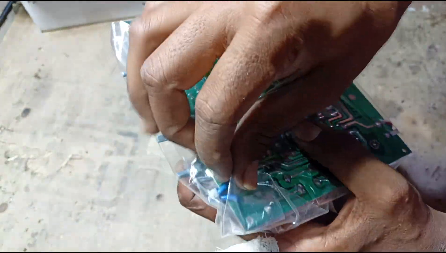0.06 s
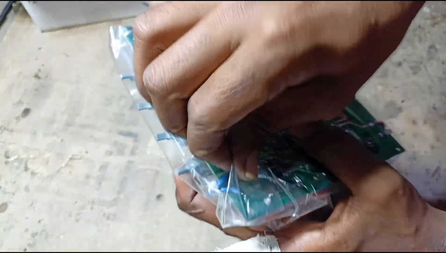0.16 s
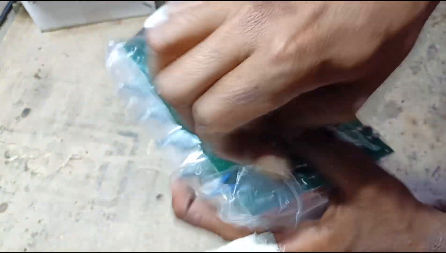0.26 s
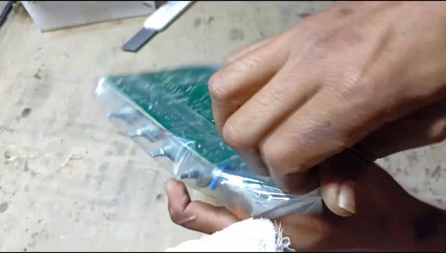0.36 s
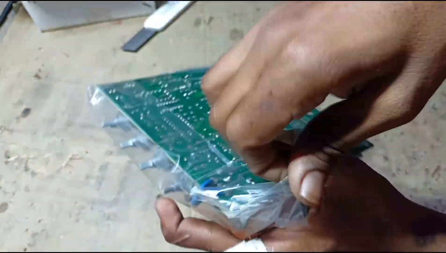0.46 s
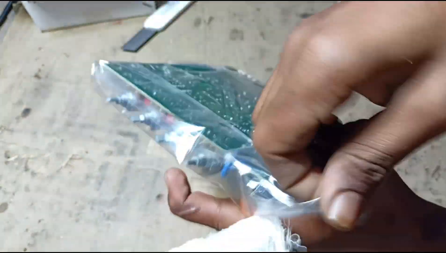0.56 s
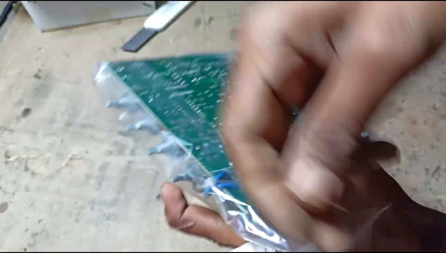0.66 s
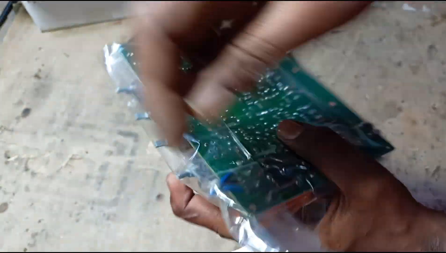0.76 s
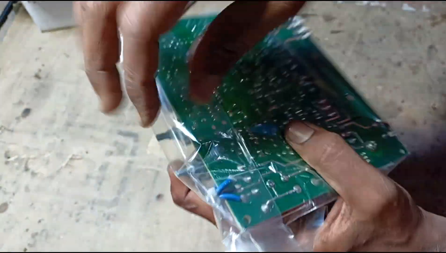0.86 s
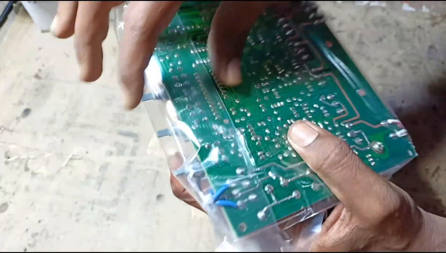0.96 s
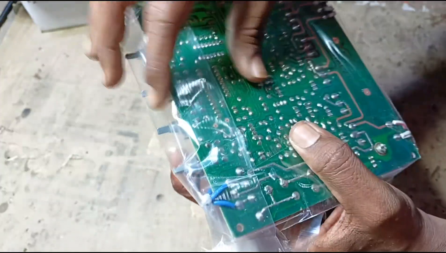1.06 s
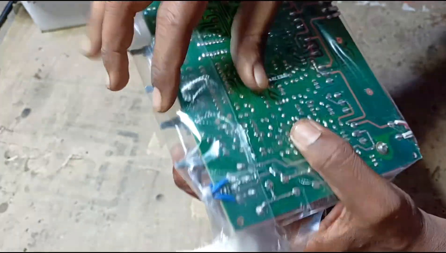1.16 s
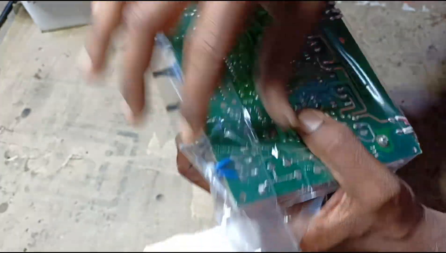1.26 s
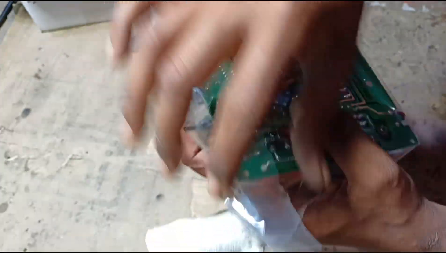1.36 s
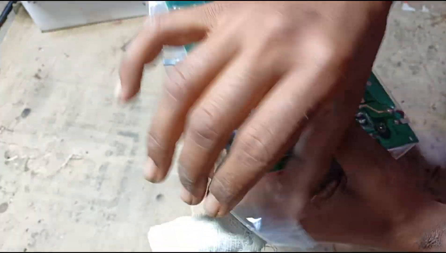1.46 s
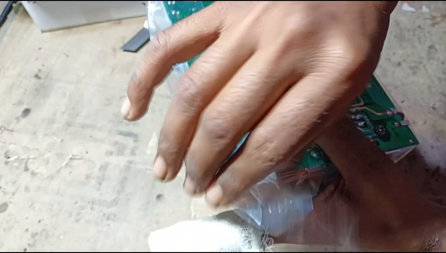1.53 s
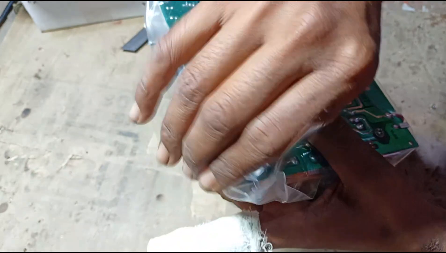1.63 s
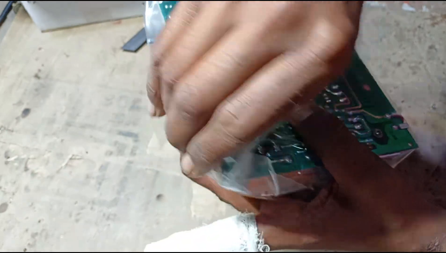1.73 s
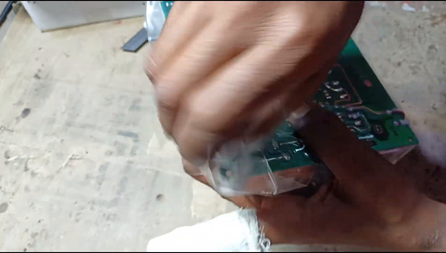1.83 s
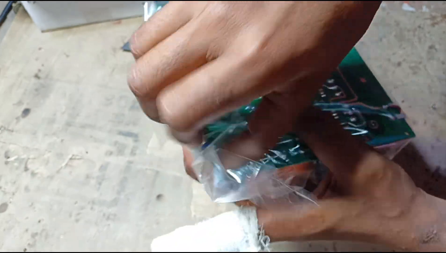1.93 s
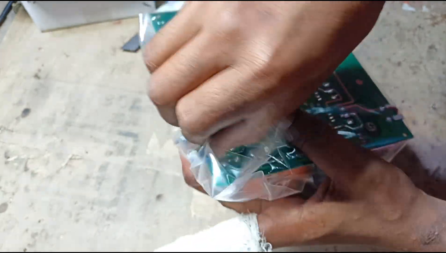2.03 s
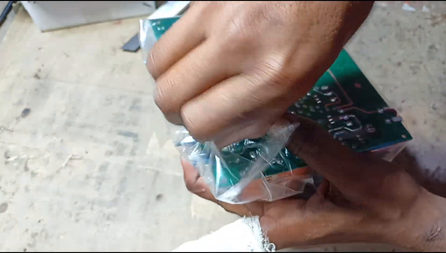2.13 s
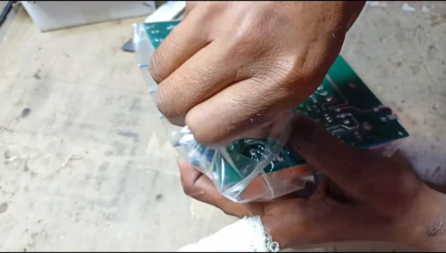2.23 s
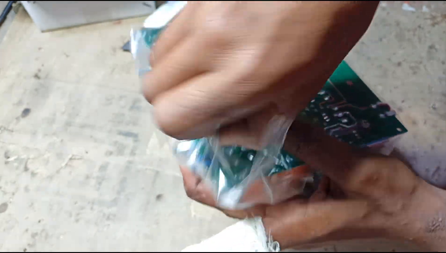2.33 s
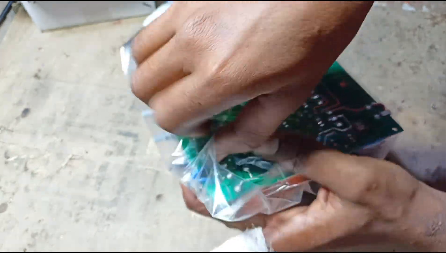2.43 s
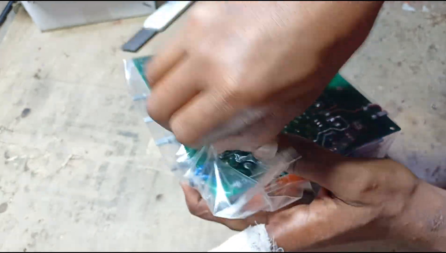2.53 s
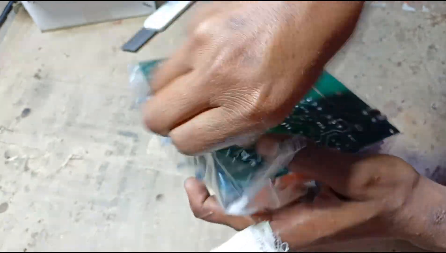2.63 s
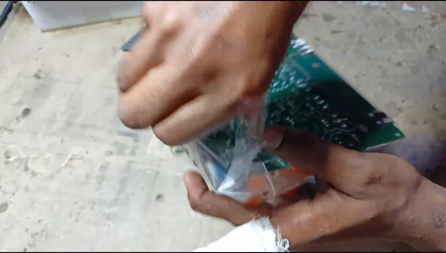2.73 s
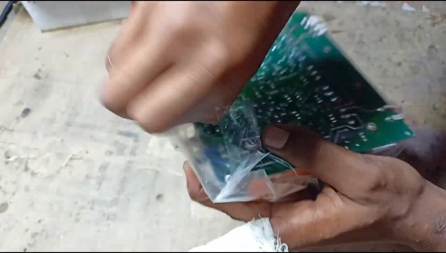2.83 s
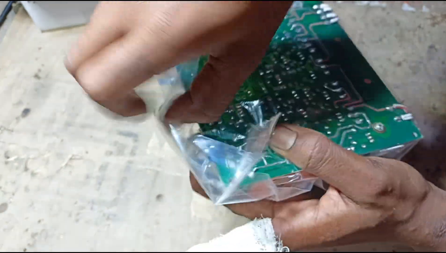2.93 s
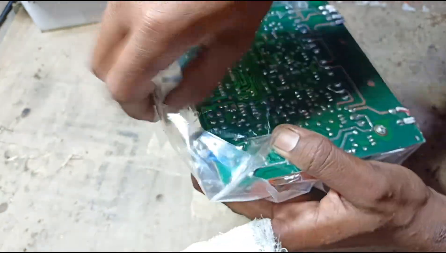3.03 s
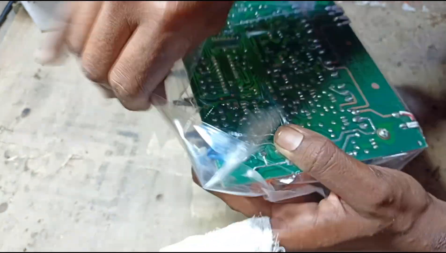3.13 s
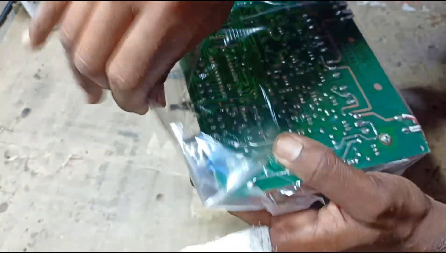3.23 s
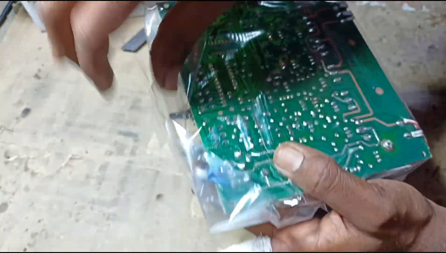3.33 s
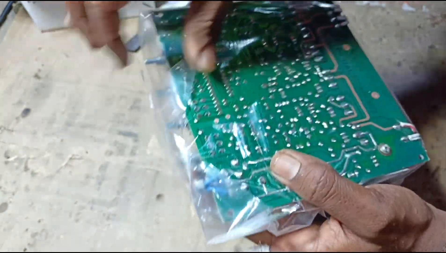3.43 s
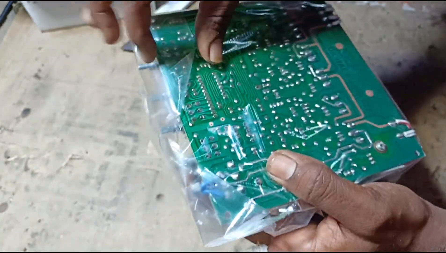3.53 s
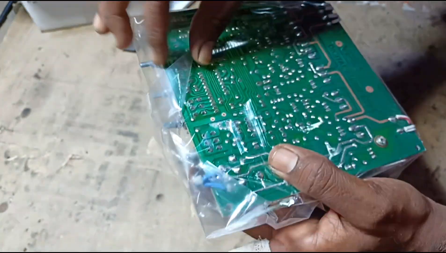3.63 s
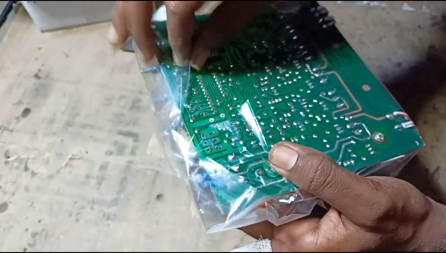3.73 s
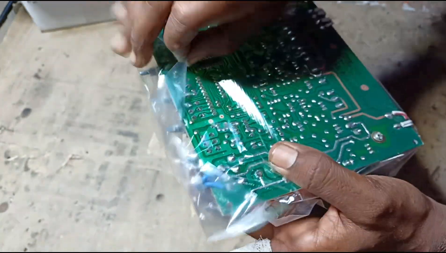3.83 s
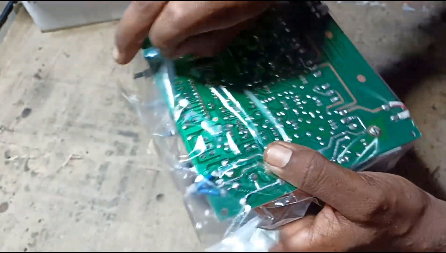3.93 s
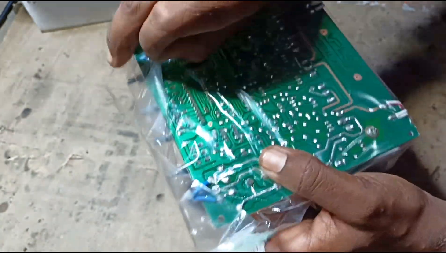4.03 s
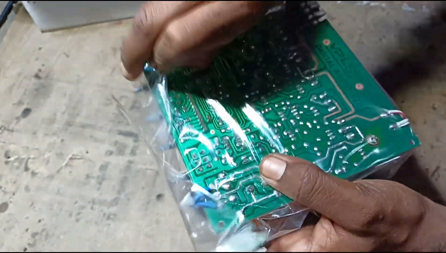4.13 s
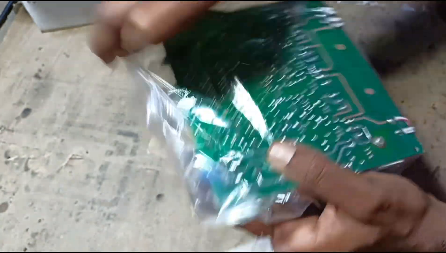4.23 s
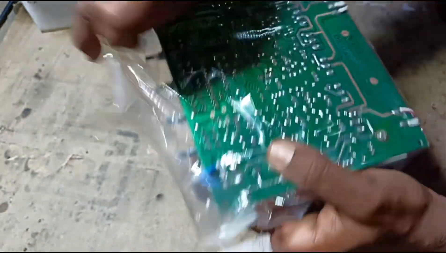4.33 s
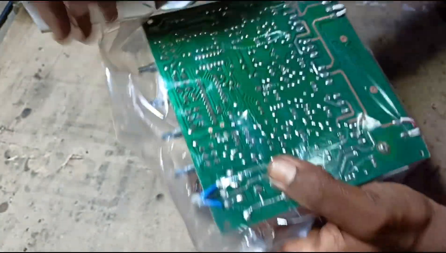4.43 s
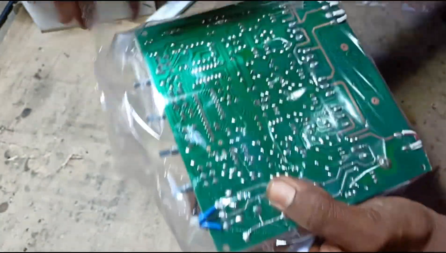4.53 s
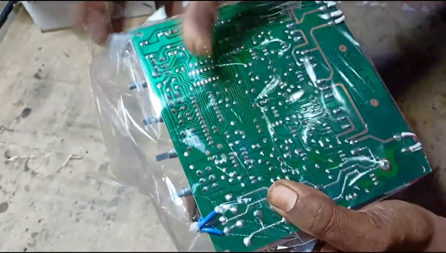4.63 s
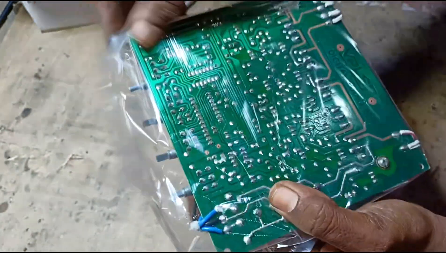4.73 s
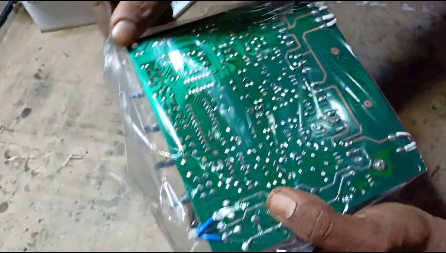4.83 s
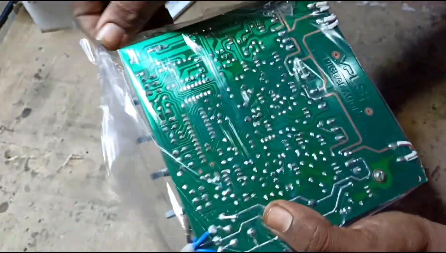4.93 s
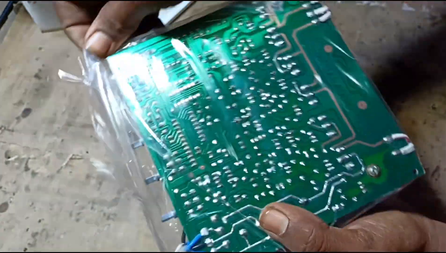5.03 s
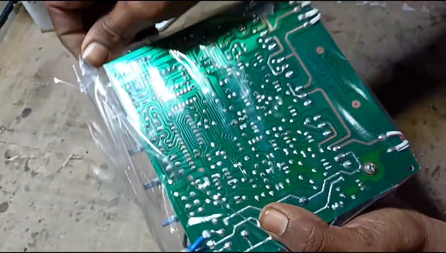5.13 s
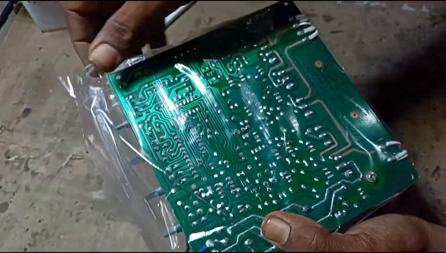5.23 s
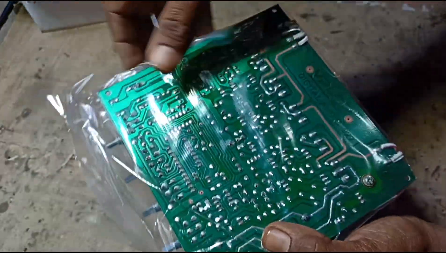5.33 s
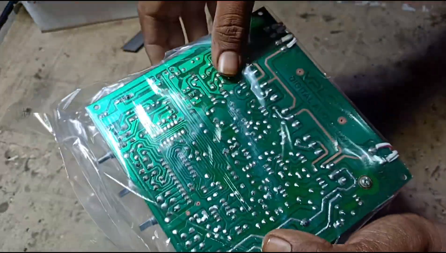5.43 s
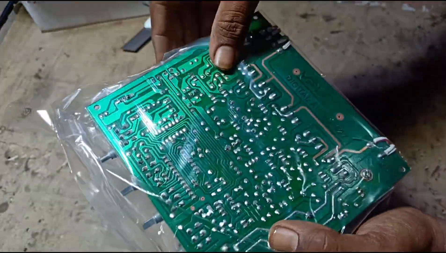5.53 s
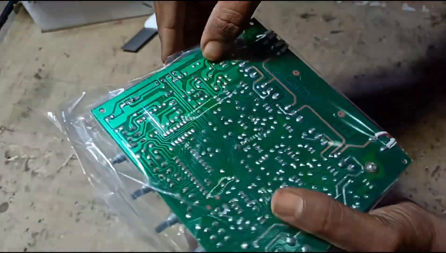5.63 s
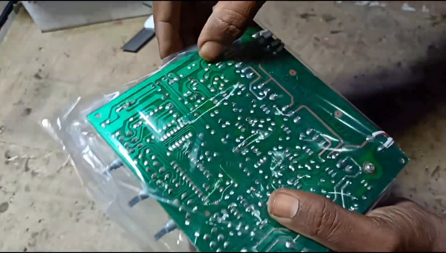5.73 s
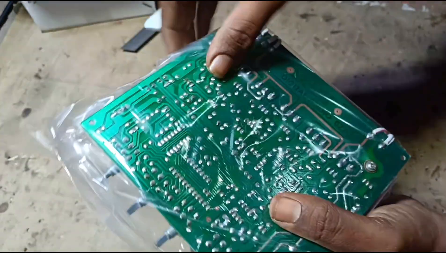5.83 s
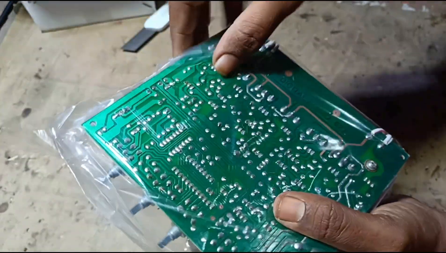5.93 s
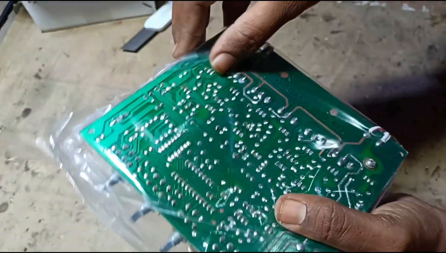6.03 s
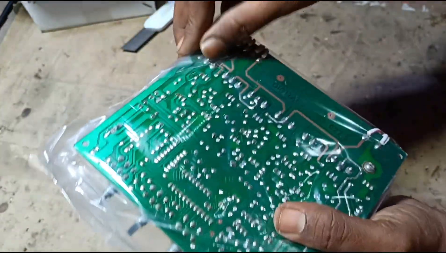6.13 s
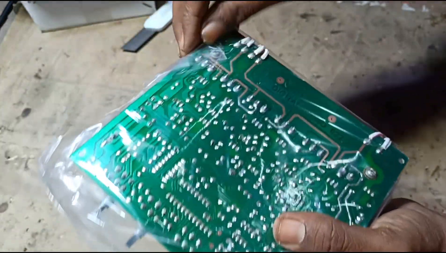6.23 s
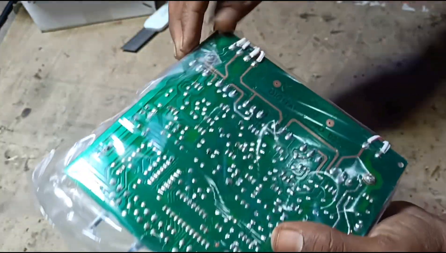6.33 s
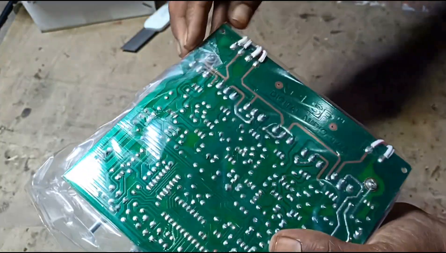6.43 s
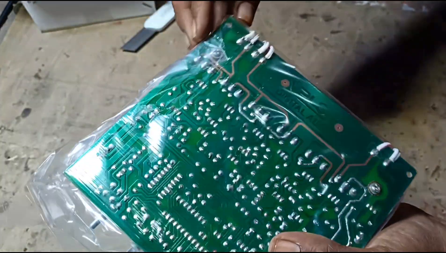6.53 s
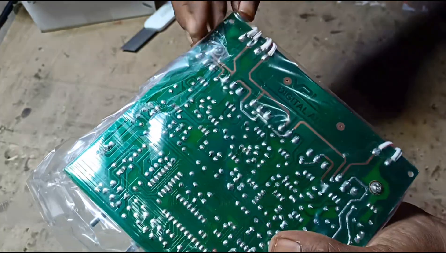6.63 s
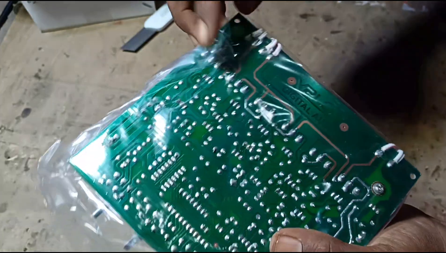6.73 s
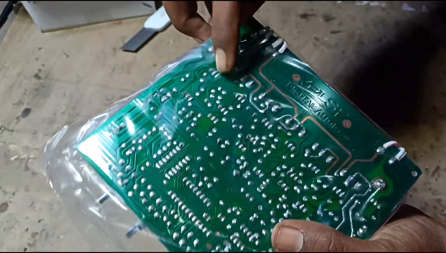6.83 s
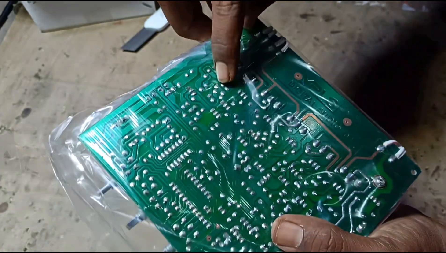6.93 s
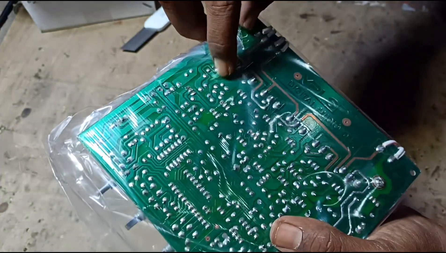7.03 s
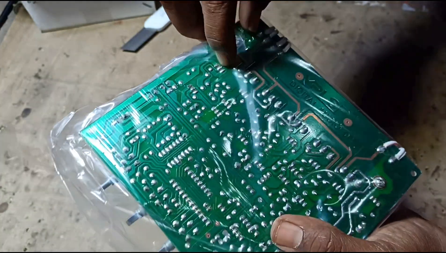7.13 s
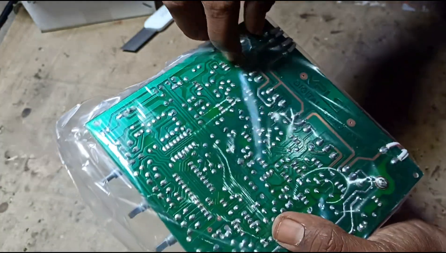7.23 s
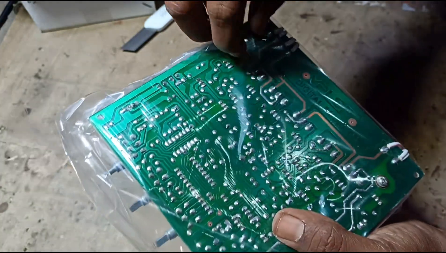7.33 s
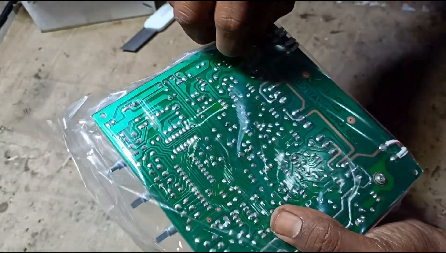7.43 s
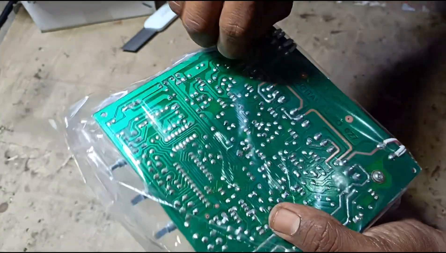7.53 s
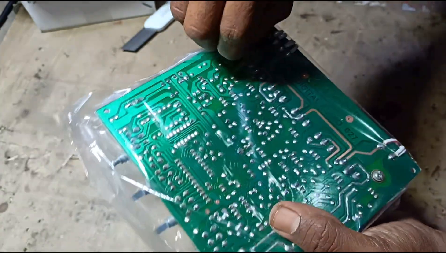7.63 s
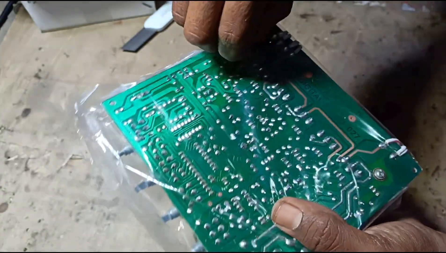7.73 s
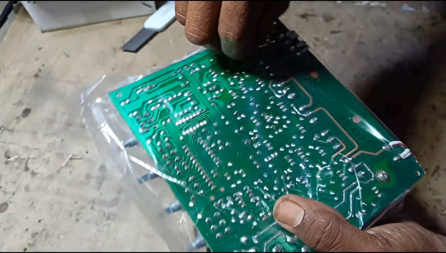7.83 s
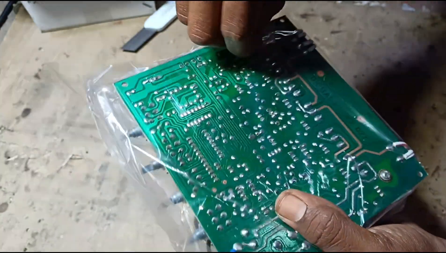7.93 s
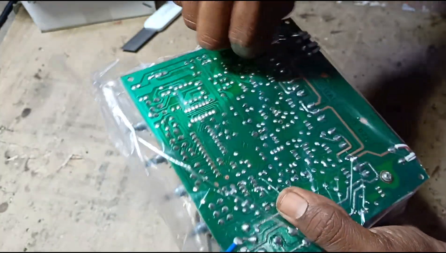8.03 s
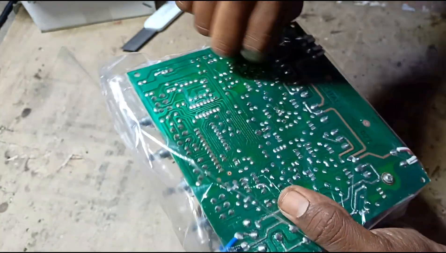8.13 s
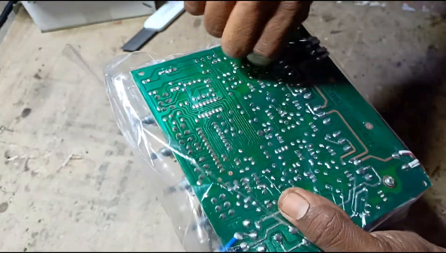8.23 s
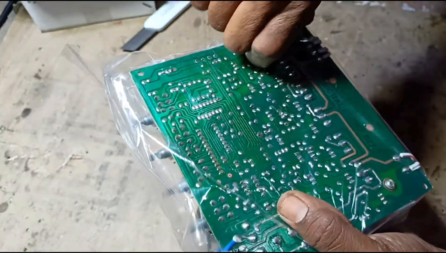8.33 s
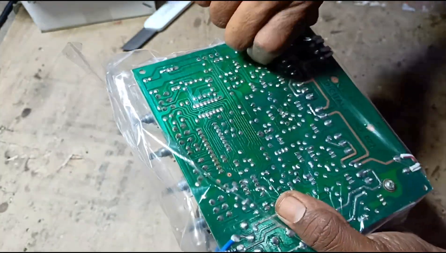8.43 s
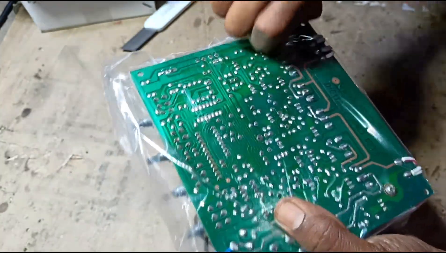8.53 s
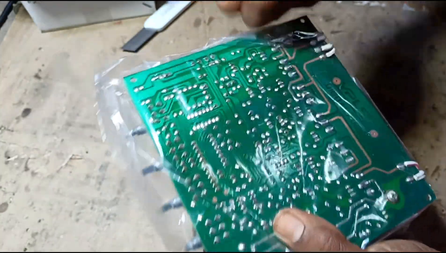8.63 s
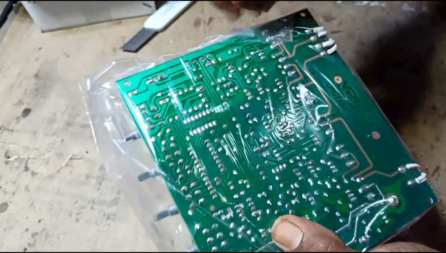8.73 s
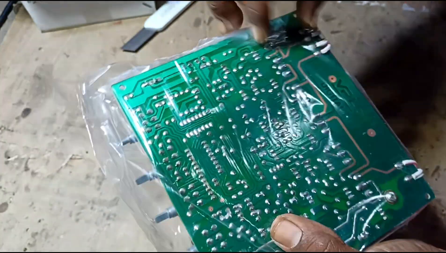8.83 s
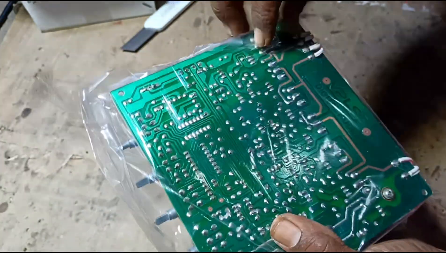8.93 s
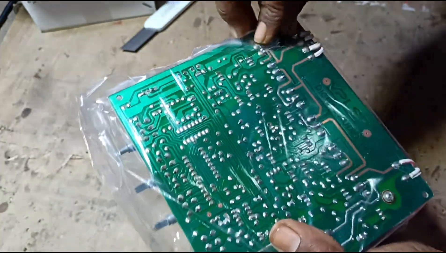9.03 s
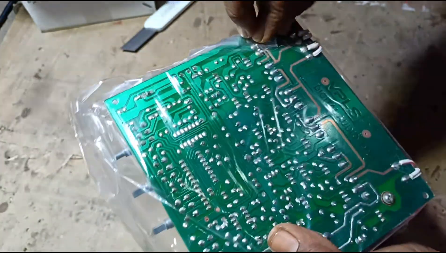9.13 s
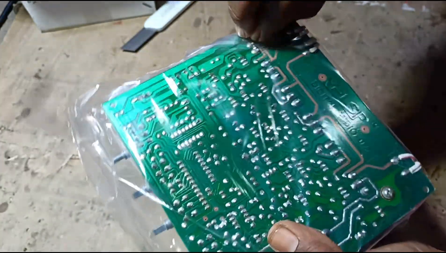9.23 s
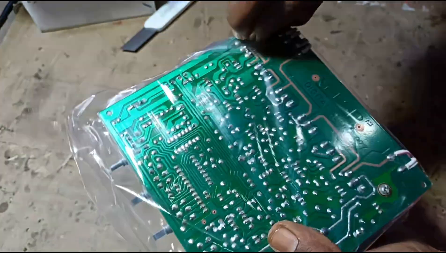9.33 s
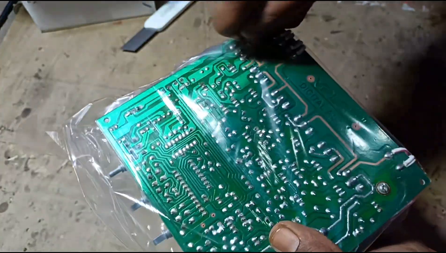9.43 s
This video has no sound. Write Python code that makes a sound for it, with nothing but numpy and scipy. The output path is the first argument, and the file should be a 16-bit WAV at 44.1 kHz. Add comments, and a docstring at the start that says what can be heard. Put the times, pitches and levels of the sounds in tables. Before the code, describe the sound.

Clear plastic film crackles and snaps sharply close up as hands pull it around a circuit board, loud tugs giving way to gentle crinkling.

```python
"""In a small room, close to a microphone, hands pull a clear plastic wrap off a circuit board.
Creases buckle in sharp snaps: impulses and short noisy rings through resonances of the film.
Dense random grains make the fine crackle and the rub of fingers and film; damped sines make knocks.
Unsteady tones make squeaks, and taut film letting go puffs air at the microphone.
The room adds a short noise-tail echo, soft air noise and a faint hum."""
import sys
import numpy as np
from scipy import signal
from scipy.fft import rfft, irfft, next_fast_len
from scipy.io import wavfile
from scipy.ndimage import uniform_filter1d

SR = 44100
rng = np.random.default_rng(int(sys.argv[2]) if len(sys.argv) > 2 else 0)


def to_wav(sig):
    """Store sig (one row per channel, or 1-D mono) as 16-bit WAV at the path in sys.argv[1].

    Samples outside -1..1 are clipped; the rate is SR.
    """
    pcm = np.clip(np.atleast_2d(sig), -1, 1) * 32767
    pcm = np.round(pcm).astype(np.int16)
    wavfile.write(sys.argv[1], SR, pcm.T)  # frames by channels


N = 417627  # length in samples


def amp(db):
    """Logarithmic level: decibels to amplitude gain."""
    return 10 ** (np.asarray(db) / 20)


def unit(x):
    """Normalisation: x scaled to rms 1."""
    return x / np.sqrt(np.mean(x ** 2) + 1e-20)


def along(points, hz):
    """Logarithmic frequency scale: (f/Hz, value) points interpolated at hz."""
    f, v = np.transpose(points)
    return np.interp(np.log(hz + 1), np.log(f + 1), v)


def filtered(x, response):
    """Linear filtering: the spectrum of x times a zero-phase response of frequency."""
    padded = next_fast_len(N + SR // 2)
    spectrum = rfft(x, padded) * response(np.fft.rfftfreq(padded, 1 / SR))
    return irfft(spectrum, padded)[:N]


def causal(db):
    """Minimum phase: the folded cepstrum gives the promptest response with these even-grid levels."""
    cepstrum = irfft(np.log(amp(db)))
    half = len(cepstrum) // 2
    cepstrum[1:half] *= 2
    cepstrum[half + 1:] = 0
    return irfft(np.exp(rfft(cepstrum)))


def add(track, s, sound):
    """Superposition: mix a sound into the track at s seconds."""
    start = max(0, round(s * SR))
    part = track[start:start + len(sound)]
    part += sound[:len(part)]


def changing(x, response, size):
    """Time-varying convolution: each stretch of x meets a new response, as the source keeps moving."""
    out = np.zeros(N)
    for start in range(0, N, size):
        stretch = x[start:start + size]
        add(out, start / SR, signal.fftconvolve(stretch, response()))
    return out


def grains(rate, spread_db, even_s):
    """Shot noise: random impulses of very unequal size, with rms near 1 over even_s seconds."""
    sizes = amp(spread_db * rng.standard_normal(N)) * rng.choice([-1, 1], N)
    train = sizes * (rng.random(N) < rate / SR)
    width = max(8, int(even_s * SR))
    power = np.abs(uniform_filter1d(uniform_filter1d(train ** 2, width), width))
    return unit(train / np.sqrt(power + .01 * np.mean(power)))


def flick(ring_db, t60, size=1024):
    """Impulsive excitation: one buckle, then bending waves scattering through the sheet."""
    t = np.arange(size) / SR
    ring = rng.standard_normal(size) * amp(-60 * t / t60) * (1 - np.exp(-t / .0003))
    ring *= amp(ring_db) / np.linalg.norm(ring)
    ring[0] = rng.choice([-1, 1])
    return ring


def hump(hz, centre_hz, octaves):
    """Broad resonance: a bell over log frequency, 1 at its centre, 1/e at the half-width in octaves."""
    return np.exp(-(np.log2((hz + 1) / centre_hz) / octaves) ** 2)


# Spectrum of the steady background noise: f/Hz, relative density/dB
AIR_SPECTRUM = [(12, -35), (20, -4.5), (219, -6.5), (416, -8.5), (686, -18), (1230, -18), (1770, -22.5),
                (2090, -28.5), (3170, -25), (4430, -23.5), (5850, -19), (6540, -25), (7310, -14),
                (9930, -32), (12100, -31.5), (14300, -22), (15500, -23)]
# Faint hum in the room: f/Hz, rms level/dB
HUM_TONES = [(123.8, -78.5), (207, -82.5)]


def still_room(air_db):
    """Stationary background: shaped noise and a faint hum of steady sines."""
    t = np.arange(N) / SR
    air = unit(filtered(rng.standard_normal(N), lambda hz: amp(along(AIR_SPECTRUM, hz))))
    hum = sum(amp(db) * np.sqrt(2) * np.sin(2 * np.pi * hz * t) for hz, db in HUM_TONES)
    return amp(air_db) * air + hum


# The fingers hold the wrap and keep it rustling:
# t/s, duration/s, crinkle level/dB, rub level/dB (before the rub's trim)
HOLD_EVENTS = [(0.0, 0.29, -47, -60), (1.457, 1.94, -49.5, -51), (3.426, 0.73, -62.5, -61.5),
               (4.16, 0.349, -50.5, -58), (4.715, .58, -49.5, -58), (5.4, 0.486, -44.5, -54),
               (5.948, .6, -55, -59), (6.588, 0.617, -56.5, -64.5), (7.244, .41, -64, -66.5),
               (7.862, 0.24, -61.5, -61.5), (8.479, .28, -57, -59), (8.886, 0.54, -56, -62.5)]
GRAB_S, LET_GO_DB_PER_S = 0.024, 407  # rise up to t, fall after the duration
# Tugs, the film tightening then slackening:
# t of the hardest pull/s, build-up/s, crinkle level/dB, rub level/dB (before the rub's trim)
TUG_EVENTS = [(0.336, 0.057, -30.5, -33), (.39, 0.11, -34.5, -54), (0.688, 0.22, -31.5, -35.5),
              (1.22, 0.18, -57, -70), (1.309, 0.14, -51.5, -57.5), (1.562, 0.067, -34, -39.5),
              (1.633, 0.15, -34, -38.5), (1.711, 0.016, -34.5, -38.5), (1.78, 0.078, -36, -45),
              (2.17, 0.18, -41, -42), (2.391, .04, -39, -46.5), (2.57, 0.23, -39, -55.5),
              (2.675, 0.012, -33, -51.5), (2.784, 0.05, -30, -43), (3.082, 0.13, -30.5, -39),
              (3.15, 0.087, -28.5, -40), (3.21, 0.12, -31.5, -42), (3.365, 0.22, -36, -43.5),
              (3.531, 0.018, -44, -67), (3.67, 0.048, -52, -69), (3.76, 0.056, -48, -54),
              (3.86, 0.045, -38, -45.5), (4.31, 0.11, -28.5, -49), (4.44, 0.28, -38, -46.5),
              (4.795, 0.0386, -31, -38.5), (4.96, .08, -33, -33.5), (5.032, 0.13, -28.5, -36),
              (5.23, 0.12, -27.5, -36.5), (5.57, 0.135, -33, -52.5), (5.67, 0.23, -34, -45.5),
              (5.851, 0.051, -34, -43), (6.12, 0.097, -42.5, -53), (6.43, 0.14, -44, -53),
              (6.91, .15, -57, -62), (7.149, 0.17, -39.5, -50), (7.501, 0.023, -45.5, -66),
              (7.6, 0.097, -49.5, -60), (8.98, 0.024, -38.5, -59), (9.2, .04, -44, -65),
              (9.275, 0.04, -43, -45), (9.353, 0.043, -38, -47), (9.46, .08, -37.5, -50)]
TIGHTEN_DB, SLACKEN_DB_PER_S = 22, 452.5  # rise over the build-up, fall after it
# Crinkle left after a snap: level relative to the snap, dB per dB of its body, fall in dB/s
SETTLE_DB, SETTLE_PER_BODY, SETTLE_DB_PER_S = -17.5, 0.43, 348.5


def handling():
    """Power addition: holds, tugs and snap settling summed into crinkle and rub levels/dB per sample."""
    t = np.arange(0, N, 44) / SR
    power = np.full((2, len(t)), 1e-10)
    for s, length, *db in HOLD_EVENTS:
        grab = np.clip((t - s) / GRAB_S + 1, 0, 1)
        let_go = amp(-LET_GO_DB_PER_S * np.maximum(t - s - length, 0))
        power += np.outer(amp(db), grab * let_go) ** 2
    for s, build_s, *db in TUG_EVENTS:
        drop_db = np.maximum(TIGHTEN_DB * (s - t) / build_s, SLACKEN_DB_PER_S * (t - s))
        power += np.outer(amp(db), amp(-drop_db)) ** 2
    for s, db, body_db, _ in CREASE_SNAPS:
        peak_db = db + SETTLE_DB + SETTLE_PER_BODY * body_db
        power[0] += (t > s) * amp(peak_db - SETTLE_DB_PER_S * np.abs(t - s)) ** 2
    return [np.interp(np.arange(N) / SR, t, 10 * np.log10(p)) for p in power]


# Bite of the film, strongest while it is still stretched over the board: t/s, level/dB
BITE_LEVELS = [(0.0, 0.5), (.6, 3), (1.6, 3.5), (2.2, 5), (2.7, 3), (3.2, 0), (4.0, 2.5), (4.5, -1.5),
               (5.1, -1.5), (5.9, -3), (6.4, -2.5), (7.1, 2.5), (7.7, -1), (8.6, -6), (9.4, 0)]


def bite_level(s):
    """Tension-dependent resonance: level of the bite in dB at s seconds."""
    return np.interp(s, *np.transpose(BITE_LEVELS))


def bite(hz):
    """Sheet resonance: the taut film's broad peak near 3.5 kHz."""
    return hump(hz, centre_hz=3533, octaves=.55)


# Spectrum of the fine crinkle: f/Hz, relative density/dB
CRINKLE_SPECTRUM = [(150, -24), (600, -4.5), (1050, 1), (1350, -4.5), (1750, -0.5), (2300, -4),
                    (3200, -0.5), (5000, 0.5), (7800, 3), (10000, -6.5), (12500, -7), (15000, 3)]
USUAL_DB = -40.5  # crinkle level of ordinary handling
SIZZLE_PER_DB, SIZZLE_HZ = 0.08, 9500  # the treble above SIZZLE_HZ grows with effort, dB per dB
SMOOTH_PER_DB = 0.2  # gentle work slides more and ticks less, dB per dB


def crinkle(db, level_db, slide_db):
    """Crackling noise: countless tiny creases, denser and brighter with effort, over sliding hiss."""
    effort_db = np.clip(db - USUAL_DB, -20, 20)
    ticks = grains(450 + 500 * amp(.5 * effort_db), spread_db=8, even_s=0.034)
    sheet = unit(changing(ticks, lambda: flick(ring_db=0.0, t60=0.012, size=512), size=1024))
    slide = amp(slide_db - SMOOTH_PER_DB * effort_db)
    rustle = (sheet + slide * rng.standard_normal(N)) / np.hypot(1, slide)
    colour = causal(along(CRINKLE_SPECTRUM, np.linspace(0, SR / 2, num=2 ** 9 + 1)))
    colour /= np.linalg.norm(colour)
    sound = signal.fftconvolve(amp(db + level_db) * rustle, colour)[:N]
    top = filtered(sound, lambda hz: 1 - 1 / (1 + (hz / SIZZLE_HZ) ** 20))
    extra_top = (amp(SIZZLE_PER_DB * effort_db) - 1) * top
    extra_bite = (amp(bite_level(np.arange(N) / SR)) - 1) * filtered(sound, bite)
    return sound + extra_top + extra_bite


# Spectrum of fingers and film sliding on the board: f/Hz, relative density/dB
RUB_SPECTRUM = [(25, -28), (70, -4.5), (160, -6), (330, 3), (500, 0.5), (680, -8.5), (1050, -9),
                (2000, -30.5), (5000, -48.5)]


def rub(db, level_db):
    """Sliding friction: small slips of fingers and film, dulled by the hand-held board."""
    slips = grains(500, spread_db=4.5, even_s=0.056)
    return amp(db + level_db) * unit(filtered(slips, lambda hz: amp(along(RUB_SPECTRUM, hz))))


# Spectrum of the shifting grip on the board: f/Hz, relative density/dB
GRIP_SPECTRUM = [(25, -18), (70, -3), (140, -4.5), (210, -0.5), (320, -15.5), (700, -32)]


def grip(rub_db, level_db, follow):
    """Low-passed contact noise: the holding hand rumbles softly, following part of the rub level."""
    rumble = unit(filtered(rng.standard_normal(N), lambda hz: amp(along(GRIP_SPECTRUM, hz))))
    return amp(level_db + follow * (rub_db + 54)) * rumble


# Lesser snaps: level over the crinkle, scatter, dB per dB of crinkle
LESSER_DB, LESSER_SPREAD_DB, LESSER_FOLLOW = 5.5, 4, 0.91


def small_snaps(crinkle_db, body_db, sizzle_db, count):
    """Random point process: lesser snaps as CREASE_SNAPS rows, standing out most in gentle handling."""
    s = rng.uniform(0, N / SR, count)
    strength, body, sizzle = rng.standard_normal((count, 3)).T
    effort_db = crinkle_db[(s * SR).astype(int)] - USUAL_DB
    db = USUAL_DB + LESSER_DB + LESSER_FOLLOW * effort_db + LESSER_SPREAD_DB * strength
    sizzles_db = sizzle_db + SIZZLE_PER_DB * effort_db + 5 * sizzle
    return np.column_stack([s, db, body_db + 7 * body, sizzles_db])


# Creases giving way: t/s, level over 5 ms/dB (before a common trim),
# body at 1 to 1.8 kHz/dB, sizzle from 11.5 kHz up/dB (both before the shared spectrum)
CREASE_SNAPS = [(0.0284, -33, -18.5, -2.5), (0.0643, -29.5, -21, 0), (0.1256, -9.5, -16.5, 2.5),
                (0.14, -28.5, 1.5, -2), (0.1864, -33.5, -7, 0), (0.2383, -9, -9, 7),
                (0.3165, -14, -14, -7.5), (0.3257, -2.5, -17, 2.5), (0.3296, -9, -21.5, 5.5),
                (0.3862, -30.5, -4, -3), (0.406, -27, -11.5, -1), (0.5154, -24.5, -10, -17.5),
                (0.541, -20.5, -9, 3), (0.6044, -25.5, -5.5, -5), (0.744, -55, -13, -6),
                (0.9476, -49.5, -6, -5), (1.1771, -45.5, -12, -3), (1.303, -36.5, -19, -8),
                (1.4776, -30.5, -14, -15), (1.511, -33.5, -11, -12), (1.623, -31, -4, -18),
                (1.766, -27.5, -8, 2), (1.7782, -18, -11, -35), (1.801, -30.5, -22, -12),
                (1.9258, -29, 0.5, 5), (2.0038, -31, -3, -9), (2.035, -35.5, 4, -8),
                (2.0537, -31.5, -22, -3), (2.0753, -29.5, 3, -1), (2.119, -39, 4, -8),
                (2.0856, -21, -2.5, 8), (2.1347, -24, -1.5, -13), (2.1432, -21, -3, 6),
                (2.167, -14.5, -19, 3), (2.1862, -18.5, -15.5, -11), (2.229, -19.5, -6.5, -0.5),
                (2.2518, -28.5, 2, 1.5), (2.3, -30, -14, -3), (2.369, -32.5, -18.5, -16),
                (2.4119, -29, -2, 4), (2.432, -22.5, -6, 4), (2.439, -21.5, -6, 7.5),
                (2.4694, -26, -8, -0.5), (2.5106, -24.5, -8, 0.5), (2.5793, -15, -14, -6),
                (2.6026, -15, -11.5, -4.5), (2.6249, -16, -9.5, -3), (2.6541, -11, -4.5, -2.5),
                (2.6663, -10.5, -14, 0.5), (2.6677, -12, -13.5, 4.5), (2.791, -24, -10, 1),
                (2.8327, -24.5, -18, 1), (2.8872, -31.5, -3, 8), (2.992, -26, -2.5, 1),
                (3.033, -27.5, -2, -1), (3.05, -27, 5, -8), (3.0768, -19, -1.5, -3), (3.1287, -12, -7, 3),
                (3.1446, -21, -5, -3), (3.18, -24.5, -8, -6), (3.198, -22, -4, 4), (3.271, -32, -14, -3),
                (3.2849, -29, -7, -4), (3.3163, -22, -8, 3), (3.4488, -37, -4, -2),
                (3.832, -33.5, -19.5, 1.5), (3.8746, -16.5, -8.5, -1.5), (3.926, -16, -11, -0.5),
                (3.953, -15, -11, 0), (4.0055, -13.5, -7.5, -5), (4.1487, -33, -9.5, -1.5),
                (4.164, -27, -6.5, 1.5), (4.1935, -26, -13.5, 3), (4.1994, -10, -17, 0.5),
                (4.2363, -5.5, -16, 6), (4.2389, -10, -7.5, -9.5), (4.3615, -18.5, -5, 4.5),
                (4.3864, -26.5, -18, 15), (4.4682, -34, -20, -1), (4.4997, -32.5, -9.5, -5),
                (4.63, -55, 0, -3), (4.7137, -33.5, -23, -8), (4.821, -26.5, -3.5, -2),
                (4.8773, -28.5, -3, 0.5), (4.9186, -20, -8.5, 3), (4.9447, -23, 0, 2),
                (4.9945, -17, -7, -7), (5.0338, -14.5, -5, 1.5), (5.129, -23, -4, 5.5),
                (5.2017, -22.5, -5, -1), (5.2229, -25, -2, -11), (5.2453, -28, -1, -1),
                (5.289, -35, -1, -5), (5.4, -43, 0, 2), (5.4858, -23.5, -14.5, -10), (5.6424, -29.5, 0, -5),
                (5.6724, -18, -8, -5), (5.698, -36, -8, 3), (5.7677, -35, -2, -6), (5.822, -28, 8.5, 11),
                (5.8386, -24, -15, -2), (6.0174, -28, -14, -6.5), (6.079, -31.5, -9, -1),
                (6.109, -26.5, -11.5, 0), (6.1425, -29, -18, 2.5), (6.162, -21.5, -15.5, 0),
                (6.2753, -25, -18, 0.5), (6.316, -19, 6, 5.5), (6.389, -30, -11, -8), (6.43, -26.5, -7, 7),
                (6.484, -25, -6.5, 1), (6.5773, -39.5, 0, -6), (6.738, -29, -8, -14),
                (6.9611, -38.5, -8.5, -18), (6.9885, -43, -11, -3), (7.008, -35, -8.5, 0),
                (7.014, -34.5, -9, 4), (7.084, -26.5, -11.5, -5), (7.105, -20.5, 6.5, 0),
                (7.1692, -19.5, -21.5, -5), (7.344, -30, -9, 3), (7.4787, -35, -15, -2),
                (7.604, -40.5, -25, 0), (7.6498, -39.5, -28, -8), (7.779, -56.5, -5, -2),
                (7.8616, -33, -25, 0), (7.8802, -39.5, -6, -5), (7.913, -41, -15, -1),
                (7.9289, -37.5, 4.5, -5), (7.9386, -30.5, -16, -10), (7.966, -40, -16, -10),
                (7.9947, -39, -4, -7), (8.0125, -45.5, 0, -18), (8.0712, -38.5, -10, -14),
                (8.2274, -47.5, 1, -2), (8.325, -50, 0, -6), (8.4853, -28.5, -0.5, 0),
                (8.51, -36.5, -11, -10), (8.5704, -29, -9, -17), (8.6264, -34.5, -5, -12),
                (8.6505, -43, -12, -14), (8.6917, -19.5, -25, -16), (8.745, -29, -8.5, -1.5),
                (8.7702, -43, -7, -7), (8.876, -42, -18, -20.5), (8.8902, -31, -14.5, -11.5),
                (8.912, -36, -17, -13), (8.9863, -35, -9, -12), (9.087, -36, 1, 1.5), (9.143, -47, -4, -14),
                (9.173, -46, -6, -4), (9.1914, -20, -21, 4), (9.2599, -30, -6, 7), (9.2748, -28, -4, -0.5),
                (9.308, -43, -12, -19), (9.4238, -31, -2, -4), (9.4428, -29, 4, -1),
                (9.4508, -23.5, -5, -4)]
# Spectrum shared by all snaps: f/Hz, relative density/dB
SNAP_SPECTRUM = [(40, -5.5), (130, -10), (330, 12.5), (680, 2.5), (1050, 5.5), (1350, 1), (1750, 5.5),
                 (2300, 0.5), (3200, 4), (5000, 3), (7800, 5.5), (10500, -2.5), (15000, 3)]
BITE_PER_BODY = 0.51  # the bite of a snap grows with its body, dB per dB
CREASE_HZ, CREASE_SPREAD_OCTAVES = 4200, 0.76  # each crease favours its own pitch: usual, scatter
CREASE_DB, CREASE_OCTAVES = 5, .35  # height and half-width of that resonance


def snaps(rows, level_db, ring_db, ring_per_body, ripple_db, size=768):
    """Snap-through buckling: each crease has its own colour, and thin-bodied ones ring less."""
    out, hz = np.zeros(N), np.fft.rfftfreq(size, 1 / SR)
    attack = SR // 200  # 5 ms
    ripple_hz = np.geomspace(250, 2800, num=18)
    anchors_hz = np.array([400, 1000, 1800, 3800, 6500, 8300, 11500])
    film = along(SNAP_SPECTRUM, hz)
    for s, db, body_db, sizzle_db in rows:
        bass_db = min(body_db, -2) - 4  # the light film moves little air at low frequencies
        bite_db = BITE_PER_BODY * body_db
        anchors_db = [bass_db, body_db, body_db, bite_db, 0, 0, sizzle_db]
        own = np.interp(np.log(hz + 1), np.log(anchors_hz), anchors_db)
        own = own + bite_level(s) * bite(hz)
        crease_hz = CREASE_HZ * 2 ** (CREASE_SPREAD_OCTAVES * rng.standard_normal())
        own = own + CREASE_DB * hump(hz, crease_hz, CREASE_OCTAVES)
        # random ups and downs of level at fixed frequencies give each snap its own colour
        ups_and_downs_db = ripple_db * rng.standard_normal(len(ripple_hz))
        ripple = np.interp(hz, ripple_hz, ups_and_downs_db, left=0, right=0)
        buckle = flick(ring_db + ring_per_body * min(body_db, 0), t60=0.02, size=size)
        snap = np.convolve(buckle, causal(own + ripple + film))
        add(out, s, amp(db + level_db) * snap / np.sqrt(np.mean(snap[:attack] ** 2)))
    return out


# Decay time of the room: f/Hz, t60/s
ROOM_DECAY = [(200, 0.13), (1500, 0.15), (5000, 0.14), (9000, 0.12), (15000, 0.13)]


def room_tail():
    """Diffuse reverberation: the walls' answer as decaying noise of energy 1, t60 varying with f."""
    hz, t, z = signal.stft(rng.standard_normal(SR // 3), SR, nperseg=256)
    decay = amp(-60 * t / along(ROOM_DECAY, hz)[:, None])
    tail = signal.istft(z * decay, SR, nperseg=256)[1]
    tail *= 1 - np.exp(-np.arange(len(tail)) / SR / 0.0035)
    return tail / np.linalg.norm(tail)


# Fingers bumping the board: t/s, initial level of the decay/dB, f/Hz
KNOCK_EVENTS = [(1.477, -32, 550), (1.581, -25, 280), (1.777, -24, 333), (2.004, -32.5, 500),
                (2.085, -29.5, 666), (2.144, -25.5, 314), (2.388, -29.5, 530), (2.792, -34, 317),
                (2.988, -32.5, 252), (4.303, -21, 580), (4.359, -26.5, 204), (5.387, -38, 386),
                (8.769, -36.5, 407), (9.274, -29, 460)]


def knocks(t60, overtone_db):
    """Damped vibration: the hand damps the board, so each bump rings for only a few cycles."""
    out, t = np.zeros(N), np.arange(SR // 8) / SR
    for s, db, hz in KNOCK_EVENTS:
        overtone = amp(overtone_db) * np.sin(2 * np.pi * 1.2 * hz * t)
        ring = np.sin(2 * np.pi * hz * t) + overtone
        add(out, s, amp(db - 60 * t / t60) * ring * (1 - np.exp(-t / 0.00044)))
    return out


# Taut film squeaking along the board's edge: t/s, f/Hz, rms level/dB
FILM_SQUEAK_PATH = [(1.8, 4900, -70), (1.83, 4760, -59), (1.868, 5270, -48), (1.908, 5630, -67),
                    (1.952, 5100, -47), (1.99, 4930, -74)]
# A fingertip dragging over the board: t/s, f/Hz, rms level/dB
FINGER_DRAG_PATH = [(5.68, 390, -56), (5.72, 404.5, -51), (5.78, 443, -46), (5.82, 381, -57),
                    (5.92, 382, -55), (5.97, 334, -78)]


def squeak(rows, jitter):
    """Stick-slip friction: slips fast enough to make an unsteady tone, here a wavering sine."""
    s, hz, db = np.transpose(rows)
    t = np.arange(round(s[0] * SR), round(s[-1] * SR)) / SR
    waver = unit(uniform_filter1d(rng.standard_normal(len(t)), size=180))
    pitch = np.interp(t, s, hz) * (1 + jitter * waver)
    phase = 2 * np.pi * np.cumsum(pitch) / SR
    out = np.zeros(N)
    add(out, s[0], np.sqrt(2) * amp(np.interp(t, s, db)) * np.sin(phase))
    return out


# Taut film letting go: t/s, nominal peak level/dB
PUFF_EVENTS = [(2.6527, -8), (3.9527, -13), (4.0069, -2), (4.2012, -13.5), (4.236, -24.5)]


def puffs(swing_hz, decay_s, rise_s):
    """Pressure transient: a sudden step of pressure that swings back as it decays."""
    out, t = np.zeros(N), np.arange(SR // 10) / SR
    swing = np.cos(2 * np.pi * swing_hz * t + 1) * np.exp(-t / decay_s)
    swing += 0.38 * np.exp(-t / 0.0013)
    for s, db in PUFF_EVENTS:
        add(out, s, amp(db) * swing * (1 - np.exp(-t / rise_s)))
    return out


def scene():
    """Superposition: the wrap close by, its echo, the puffs and the room's own sound."""
    crinkle_db, rub_db = handling()
    lesser = small_snaps(crinkle_db, body_db=-7.5, sizzle_db=-2, count=380)
    creases = np.vstack([CREASE_SNAPS, lesser])
    film = snaps(creases, level_db=-1, ring_db=2.0, ring_per_body=0.3, ripple_db=2.5)
    film += crinkle(crinkle_db, level_db=0.0, slide_db=-8.0)
    board = rub(rub_db, level_db=-4.5) + grip(rub_db, level_db=-59.0, follow=0.43)
    board += knocks(t60=0.03, overtone_db=-16.5)
    squeaks = squeak(FILM_SQUEAK_PATH, jitter=0.0025) + squeak(FINGER_DRAG_PATH, jitter=0.097)
    near = film + board + squeaks
    echo = amp(-13.0) * changing(near, room_tail, size=8192)
    air_puffs = puffs(swing_hz=88, decay_s=0.0033, rise_s=.0001)
    return (near + echo + air_puffs + still_room(air_db=-71))[None]


def suppress(x, threshold_db, depth_db):
    """Downward expansion: treble below the threshold is turned down, by depth_db at most."""
    treble = filtered(x, lambda hz: hz ** 4 / (hz ** 4 + 600 ** 4))
    power = np.abs(uniform_filter1d(treble ** 2, size=400))
    gain_db = np.clip(10 * np.log10(power + 1e-14) - threshold_db, -depth_db, 0)
    return x + (amp(gain_db) - 1) * treble


TOP_HZ = 15550  # where the band starts to end


def slope_off(hz):
    """Band limiting: gain at the top of the band, a steep step, a low shelf, then almost nothing."""
    return amp(np.interp(hz - TOP_HZ, [-100, 250, 800, 1250, 1500], [0, -18, -19, -50, -120]))


def record(dry):
    """Band limiting and saturation: less deep bass, hushed faint treble, rounded peaks, steep top."""
    thin = signal.sosfilt(signal.butter(2, 44, 'high', fs=SR, output='sos'), dry[0])
    hushed = suppress(thin, threshold_db=-56.0, depth_db=2.5)
    rounded = hushed / (1 + np.abs(hushed / .74) ** 4) ** (1 / 4)
    return filtered(rounded, slope_off)[None]


dry = scene()
out = record(dry)
to_wav(out)
```